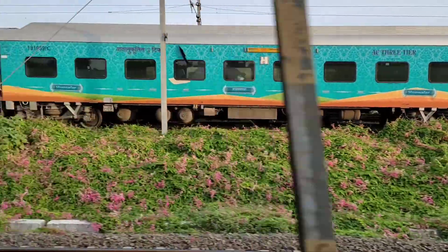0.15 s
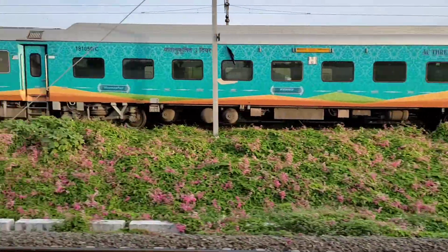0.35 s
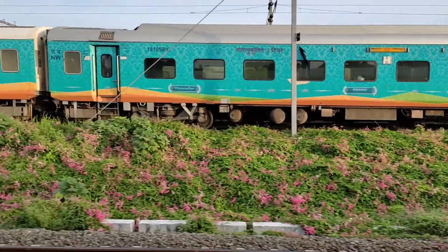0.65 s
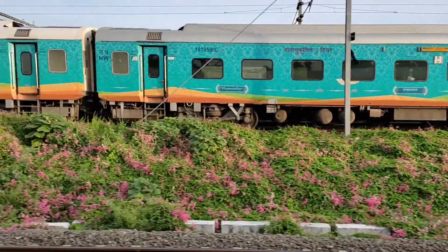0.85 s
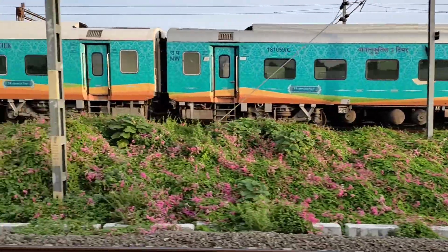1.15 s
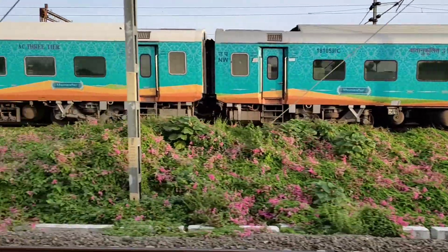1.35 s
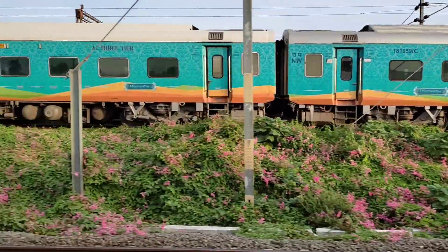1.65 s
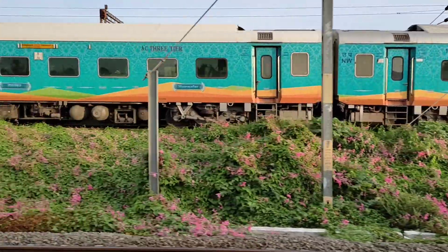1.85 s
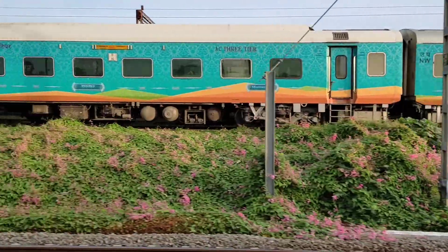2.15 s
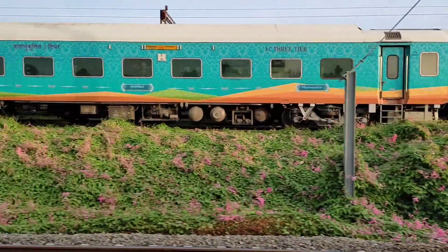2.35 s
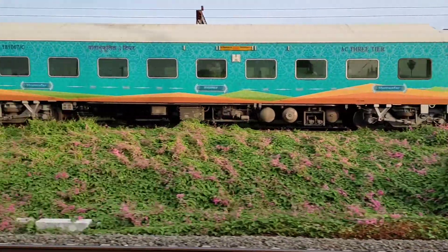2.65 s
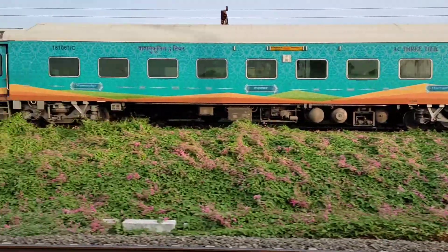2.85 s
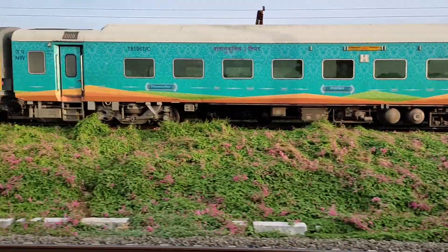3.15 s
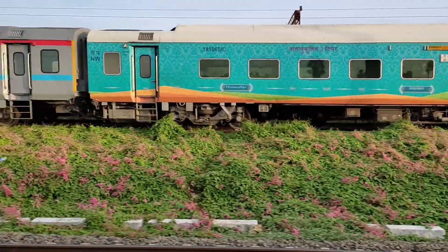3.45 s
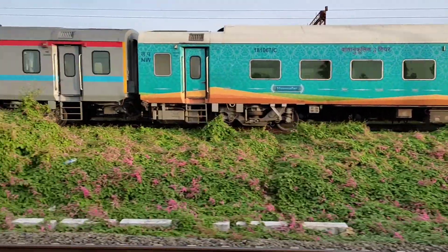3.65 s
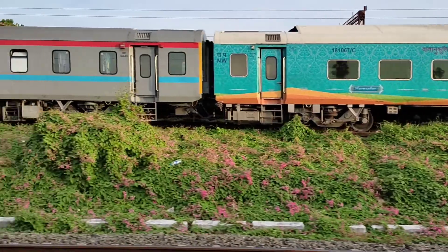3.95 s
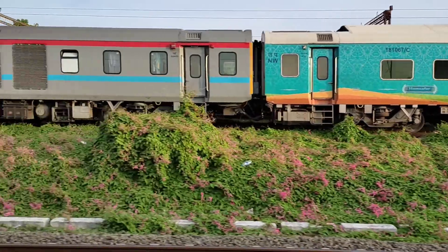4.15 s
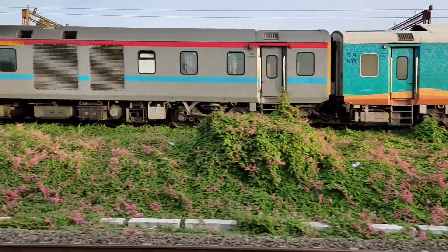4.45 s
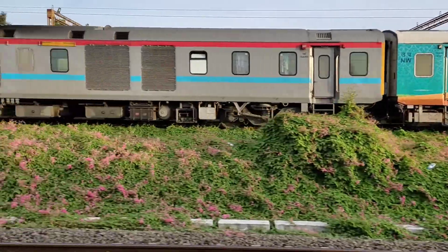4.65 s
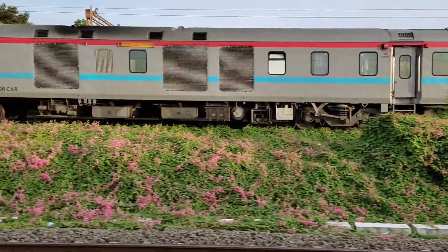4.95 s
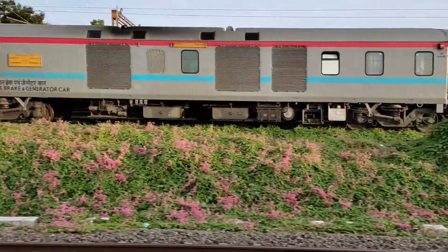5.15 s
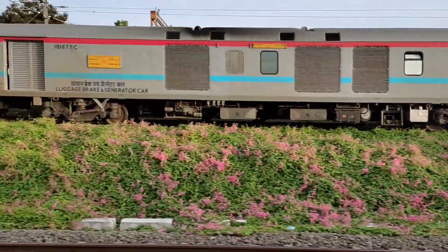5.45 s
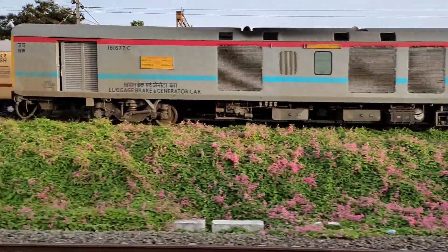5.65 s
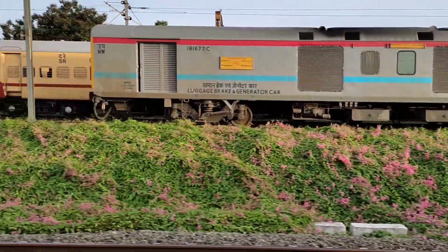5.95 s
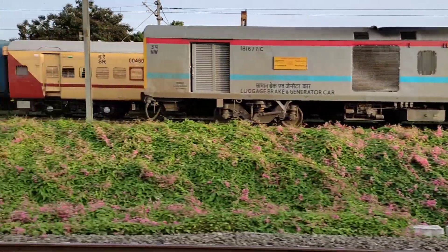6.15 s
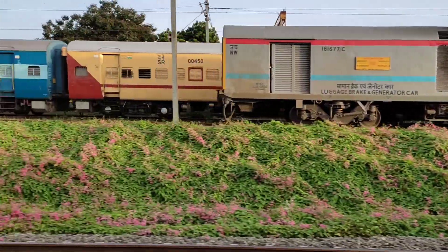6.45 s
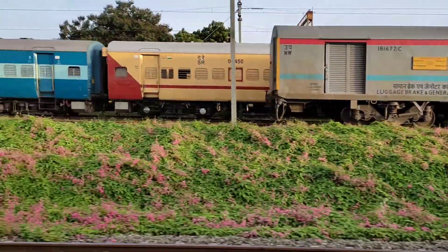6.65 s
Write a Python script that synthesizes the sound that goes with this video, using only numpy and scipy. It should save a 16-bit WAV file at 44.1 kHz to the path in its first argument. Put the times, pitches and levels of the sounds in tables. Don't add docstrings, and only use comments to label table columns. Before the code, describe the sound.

Heavy, low wind noise dominates, fluttering and popping on an exposed recorder aboard a train. Wheels hiss and ring quietly on the rails, joints clack softly, and brush swishes briefly past. Just after three seconds, a sharp clack and a chirp lead into a single buzzing air-horn blast with a blurred tail. More gusts and hard thumps follow, the sound sagging after the strongest, with muffled treble.

```python
import sys
import numpy as np
from scipy import signal
from scipy.fft import rfft, irfft, next_fast_len
from scipy.io import wavfile
from scipy.ndimage import uniform_filter1d, map_coordinates

SR = 44100
rng = np.random.default_rng(int(sys.argv[2]) if len(sys.argv) > 2 else 0)


def amplitude_ratio(level_db):
    exponent = np.asarray(level_db, float) / 20
    return 10 ** exponent


def master_out(mix):
    frames = np.transpose(np.atleast_2d(mix))
    ceiling = np.clip(frames, -1, 1)
    pcm = np.round(ceiling * 32767).astype(np.int16)
    wavfile.write(sys.argv[1], SR, pcm)


N = 300223

# (time [s], depth [dB], hold [s], recovery [s])
DUCKS = [(-.05, 10, .07, 0.81), (0.456, 25, .36, 0.045), (0.892, 18, 0.052, 0.36), (1.008, 4, .28, 0.7),
         (2.126, 10, 0.3, .28), (4.299, 23, 0.2, 0.084), (4.343, 11.5, .3, 0.32), (5.369, 12.5, .11, 0.26),
         (5.501, 3.5, 0.076, 0.28), (5.962, 14.5, .11, 0.16), (6.102, 4.5, 0.12, .26),
         (6.464, 13.5, 0.095, 0.34)]
DUCK_ATTACK_S = 0.05
ROAR_SHARE, CALM_SHARE, ECHO_SHARE = 0.34, 0.33, 0.47

# (frequency [Hz], density [dB per Hz])
ROAR_COLOUR = [(350, -33.5), (600, -5), (1090, -5), (1370, -9), (1510, -7.5), (2000, -10), (2390, -6),
               (2890, -15.5), (3340, -17.5), (3690, -26.5), (5200, -43), (6760, -73), (11400, -120)]
# (frequency [Hz], density [dB per Hz])
HISS_COLOUR = [(2710, -30), (4600, -7.5), (5330, -14), (5930, -3), (6640, -2.5), (7300, -1), (7600, -13.5),
               (9880, -36), (16700, -120)]
# (frequency [Hz], density [dB per Hz])
AIR_COLOUR = [(500, -120), (1000, 3), (3000, -12), (5000, -16.5), (7600, -11)]
ROAR_DB, HISS_DB, AIR_DB = -49, -63.5, -59.5
# (frequency [Hz], width [Hz], level re roar [dB])
WHEEL_RINGS = [
    (1811, 87, -10.5),
    (2130, 95, -14),
    (2383, 46, -11.5),
    (2690, 42, -17),
]
# (time [s], level [dB], length [s])
JOINTS = [(0.54, -54, 0.065), (0.841, -56.5, .055), (1.161, -64.5, .04), (1.772, -54, 0.092),
          (2.057, -53, 0.05), (2.509, -55, .04), (3.196, -44, 0.053), (4.58, -53.5, 0.022),
          (4.834, -62, 0.042), (5, -59.5, 0.031)]
# (frequency [Hz], density [dB per Hz])
CLATTER_COLOUR = [(600, -24), (1200, 4), (2400, -2.5), (3500, -10.5), (4500, -16.5), (5300, -18),
                  (6500, -12), (7500, -14.5)]
# (time [s], attack [s], hold [s], release [s], level [dB])
SWISHES = [
    (0.113, 0.082, 0.23, 0.052, -62.5),
    (2.324, .04, .06, .08, -65),
]
SWISH_HZ, SWISH_WIDTH_HZ = 7050, 800

# (time [s], pitch [Hz], level [dB])
SQUEAK = [
    (3.25, 740, -60),
    (3.268, 738, -28),
    (3.295, 722, -21),
    (3.32, 716, -25),
    (3.34, 712, -32),
    (3.37, 706, -65),
]
# (time [s], level [dB], tilt [dB per octave])
LOW_BLAST = [(3.315, -71, 1.5), (3.34, -38, 5), (3.357, -24.5, 0), (3.45, -23.5, 0), (3.6, -22, -1.3),
             (3.72, -26.5, 2.5), (3.84, -28.5, 0), (3.885, -39, -6), (4.0, -45, -12), (4.3, -78, -5)]
# (time [s], level [dB], tilt [dB per octave])
HIGH_BLAST = [(3.42, -70.5, -4.5), (3.52, -47, 4), (3.65, -28.5, 0.1), (3.8, -33, 0.6), (4.02, -37.5, 2.5),
              (4.06, -41, -0.7), (4.2, -44, -2.7), (4.3, -52.5, 0.5), (4.34, -77.5, -1.5)]
# (multiple of the pitch, level [dB])
LOW_BELL = [
    [(1, -3), (2, -5.5), (3, -4), (4, -7.5), (5, -13), (6, -13), (7, -22.5), (8, -10), (9, -21.5), (10, -21), (11, -36), (12, -39), (13, -41.5), (14, -49.5), (15, -47), (16, -56), (17, -55), (18, -53), (19, -44.5), (20, -34), (21, -38), (22, -35), (23, -33), (24, -35), (25, -31.5)],
    [(1, -5), (2, -6), (3, -6), (4, -8.5), (5, -15.5), (6, -10.5), (7, -11), (8, -20.5), (9, -22.5), (10, -26), (11, -32.5), (12, -26.5), (13, -34.5), (14, -33.5), (15, -34.5), (16, -39.5), (17, -42.5), (18, -41), (19, -45.5), (20, -40.5), (21, -41), (22, -40.5), (23, -51.5), (24, -44), (25, -44)],
]
# (multiple of the pitch, level [dB])
HIGH_BELL = [
    [(1, -17), (2, -14.5), (3, -17.5), (4, -20), (5, -11), (6, -15), (7, -10.5), (8, -23.5), (9, -22), (10, -25), (11, -24.5), (12, -27), (13, -27), (14, -35), (15, -36), (16, -42), (17, -43), (18, -37), (19, -34), (20, -36), (21, -41.5), (22, -50), (23, -42.5), (24, -40)],
    [(1, -2), (2, -10.5), (3, -18), (4, -15.5), (5, -4), (6, -27.5), (7, -27), (8, -11), (9, -37), (10, -18.5), (11, -25), (12, -31), (13, -32), (14, -27), (15, -41), (16, -50.5), (17, -37), (18, -46), (19, -31.5), (20, -25), (21, -31), (22, -36), (23, -39), (24, -36.5)],
]
# (time [s], attack [s], hold [s], release [s], level [dB])
BLAST_AIR = (3.33, .03, .66, .12, -60)
LOW_HZ, HIGH_HZ = 291.8, 307.4
OVERSHOOT, SETTLE_S = 0.011, 0.045
ECHO_TOP_HZ = 4800

# (frequency [Hz], density [dB per Hz])
PUFF_COLOUR = [(200, -10.5), (380, -0.5), (650, -8), (1000, -16.5), (1800, -30), (3000, -39), (6000, -120)]
# (time [s], puff [dB], t60 [s])
MORE_PUFFS = [(.275, -24, .03), (.3, -23, .03), (.345, -25, .02), (.358, -23, .025), (.406, -19, .025),
              (.422, -18, .035), (.443, -20, .02), (.475, -20, .03), (.494, -18, .03), (.51, -24, .02),
              (1.16, -26, .025), (2.099, -24, .03), (2.132, -22, .03), (2.33, -26, .03), (2.484, -21, .025),
              (3.195, -22, .05), (3.345, -19, .025), (3.47, -23, .025), (4.257, -21, .04), (4.502, -15, .03),
              (4.717, -21, .03), (5.2, -24, .03), (5.328, -20, .04), (5.362, -17, .04), (5.4, -29, .03),
              (5.464, -23, .025), (5.745, -25, .025), (5.893, -21, .04), (6.165, -27, .025), (6.234, -16, .04),
              (6.265, -20, .035), (6.31, -21, .035), (6.467, -18, .04), (6.497, -20, .03), (6.512, -22, .025),
              (6.57, -25, .025), (6.594, -24, .025), (6.795, -19, .05)]
MORE_PUFF_HZ, MORE_PUFF_SWING_DB, MORE_PUFF_SNAP = 260, 0, 3
# (time [s], swing [dB], pitch [Hz], puff re swing [dB])
THUMPS = [(0.098, -15.5, 194, -11), (.276, -21.5, 114, -7), (.316, -11, 140, -22),
          (0.387, -16, 126.8, -14.5), (.42, -12, 156.2, -14), (.555, -3.5, 165, -25),
          (1.779, -4.5, 167.3, -20.5), (2.062, -3, 162, -26), (2.097, -8.5, 166.7, -15),
          (2.127, -14, 97, -11), (2.419, -27, 93, -3.5), (2.483, -14, 175, -9.5), (2.866, -11, 110, -22),
          (3.192, -3, 135, -20), (3.266, -11, 181.3, -20), (4.101, -9.5, 241.4, -13.5),
          (4.255, -5.5, 166.7, -14.5), (4.716, -18.5, 206, -7), (5.158, -23.5, 140, -9.5),
          (5.314, -15, 91.8, -17), (5.659, -19, 97.7, -13.5), (5.892, -13, 102.3, -7.5),
          (6.264, -12.5, 91.6, -13), (6.294, -12.5, 87, -11), (6.466, -17, 208, -5),
          (6.594, -20.5, 90.5, -10.5)]
THUMP_T60_S = 0.047
# (time [s], puff [dB], t60 [s])
PUFFS = [(.004, -19.5, 0.046), (0.045, -11.5, 0.016), (.13, -17.5, .03), (.464, -14.5, 0.049),
         (.494, -19.5, 0.033), (0.789, -27.5, 0.023), (.818, -17, 0.1), (0.884, -18.5, 0.016),
         (.848, -20.5, .025), (2.209, -10.5, 0.035), (4.716, -22.5, 0.023), (5.329, -21, .02),
         (1.004, -12, 0.033), (1.017, -31, .019), (1.507, -19, .04), (2.203, -17, 0.033),
         (2.282, -23.5, 0.031), (2.432, -22.5, 0.018), (2.799, -20, 0.034), (4.297, -12, 0.042),
         (4.362, -18.5, 0.038), (4.39, -11, 0.019), (4.503, -15, 0.06), (5.975, -20.5, 0.027),
         (5.174, -13.5, .023), (5.36, -21.5, .024), (5.442, -16, .028), (5.951, -17, 0.023),
         (6.233, -20, .013), (6.621, -16.5, 0.05)]
PUFF_SWING_HZ, PUFF_SWING_DB = 140, -8.5
PUFF_SNAP = 11
# (time [s], puff [dB], t60 [s])
FLURRY = [(.925, -23, 0.032), (.937, -16.5, .03), (.948, -17, 0.035), (.964, -19.5, 0.066),
          (4.51, -17, .026), (.3, -27, .04), (.48, -22.5, .04), (6.5, -21.5, .04), (6.006, -23, .03)]
FLURRY_HZ, FLURRY_SWING_DB = 250, 4.5
# (time [s], peak [dB])
TICKS = [
    (1.0063, -45.5),
    (2.21, -39),
    (4.2983, -56.5),
    (5.176, -49),
    (5.951, -54),
]

# (frequency [Hz], density [dB per Hz])
DEEP_COLOUR = [(15, -40), (30, -20), (45, -14), (62, -2.5), (95, -2), (120, -6), (170, -35.5), (300, -120)]
# (frequency [Hz], density [dB per Hz])
BODY_COLOUR = [(50, -120), (85, -7), (115, -1), (170, 1.5), (250, -5), (320, -8.5), (450, -28), (900, -120)]
# (frequency [Hz], density [dB per Hz])
FLUTTER_COLOUR = [(200, -120), (290, -25), (350, -1), (500, -5), (800, -12.5), (1200, -24.5), (2000, -38.5),
                  (5000, -120)]
# (centre time [s], strength [dB], half length [s], deep buffet re body [dB])
GUSTS = [(0.019, -17, 0.17, 2), (0.52, -20, 0.12, -1), (0.971, -16, .09, -5.5), (1.454, -24.5, 0.17, -4.5),
         (1.817, -22, 0.062, -5.5), (1.919, -29.5, 0.089, 0.5), (2.459, -23.5, 0.37, -2.5),
         (2.624, -24.5, .06, -3), (2.931, -22.5, .09, -3), (3.29, -18, 0.07, -1.5), (3.39, -24, .03, 0),
         (3.494, -24, 0.12, 2), (3.765, -25, .06, -4), (3.99, -21, 0.08, 2), (4.311, -14, 0.089, -1),
         (4.55, -22, .05, 1), (4.995, -26.5, 0.1, -2), (5.198, -20, 0.074, -4.5), (5.361, -18, .09, 4),
         (5.683, -23, 0.15, -2.5), (5.964, -19, 0.08, 2), (6.263, -15, .08, -6.5), (6.488, -15, 0.06, -4),
         (6.623, -22, 0.094, -2.5), (4.66, -31, 0.055, 4), (6.368, -24.5, 0.067, 4.5)]
# (centre time [s], strength [dB], deep buffet re body [dB])
SLAPS = [(.315, -14.5, -10), (.43, -13, -8.5), (0.842, -15.5, -9), (1.07, -31.5, 10), (1.17, -27, 7),
         (1.52, -23, -5), (1.455, -21, -3), (.59, -24, -5), (3.93, -19, -3), (2.6, -23, -3),
         (2.08, -16, -13), (2.222, -18.5, -1), (3.215, -24, -5.5), (4.112, -24, 0), (4.41, -26, 3),
         (4.72, -22, -1), (4.842, -22.5, -4), (4.585, -21, -2), (.95, -19, -12), (4.725, -24, -8),
         (5.458, -15.5, -8.5), (6.8, -16.5, -7)]
SLAP_S, GUST_EDGE = 0.035, 1.4
CALM_DB, CALM_DEEP_DB = -28, -2
FLUTTER_DB, FLUTTER_GROWS = -35, 0.98

TOP_HZ = 7620


def unit(x):
    return x / np.sqrt(np.mean(x ** 2) + 1e-20)


def curves(rows):
    s, *cols = np.transpose(rows)
    return [np.interp(np.arange(N) / SR, s, c) for c in cols]


def wobble(rate, size=N):
    knots = rng.standard_normal(int(size * rate / SR) + 4)
    return map_coordinates(knots, [np.arange(size) * rate / SR])


def filtered(x, response):
    m = next_fast_len(N + SR // 2)
    return irfft(rfft(x, m) * response(np.fft.rfftfreq(m, 1 / SR)), m)[..., :N]


def colour(points):
    f, v = np.transpose(points)
    return lambda hz: amplitude_ratio(np.interp(np.log(hz + 1), np.log(f), v))


def resonance(centre_hz, width_hz):
    return lambda hz: 1 / (1 + (2 * (hz - centre_hz) / width_hz) ** 2)


def rush(response, patchy_db):
    z = signal.stft(rng.standard_normal(N + 512), nperseg=512)[2]
    field = uniform_filter1d(rng.standard_normal(z.shape), size=5, axis=0)
    field = uniform_filter1d(field, size=10, axis=1)
    patchy = signal.istft(z * amplitude_ratio(patchy_db * unit(field)), nperseg=512)[1][:N]
    return unit(filtered(patchy, response))


def ramp(s, attack, hold, release):
    knots = np.cumsum(np.abs([0, attack, hold, release]))
    return np.interp(np.arange(N) / SR - s, knots, [0, 1, 1, 0])


def bursts(rows, rise):
    env, t = np.zeros(N + SR), np.arange(SR // 2) / SR
    for s, db, t60 in rows:
        env[round(s * SR):][:len(t)] += amplitude_ratio(db - 60 * t / t60) * (1 - np.exp(-t / rise))
    return env[:N]


def ducking():
    dips = [db * ramp(s, DUCK_ATTACK_S, hold - DUCK_ATTACK_S, back) for s, db, hold, back in DUCKS]
    return -np.max(dips, axis=0)


def wheel_roar():
    roar = rush(colour(ROAR_COLOUR), patchy_db=1.5)
    for hz, width, db in WHEEL_RINGS:
        roar = roar + amplitude_ratio(db + 1.5 * wobble(6)) * rush(resonance(hz, width), patchy_db=-0.9)
    return roar


def brush_swishes():
    passing = sum(amplitude_ratio(db) * ramp(*shape) for *shape, db in SWISHES)
    return passing * rush(resonance(SWISH_HZ, SWISH_WIDTH_HZ), patchy_db=-1.5)


def joint_clatter():
    t, joints = np.arange(N) / SR, np.zeros(N)
    for s, db, length in JOINTS:
        joints += amplitude_ratio(db) * np.clip((t - s) / 0.008, 0, 1) * np.exp(-(np.abs(t - s) / length) ** 3)
    return amplitude_ratio(9) * joints * amplitude_ratio(1.5 * wobble(90)) * rush(colour(CLATTER_COLOUR), patchy_db=1.4)


def rolling():
    duck_db = ducking()
    roar = wheel_roar()
    hiss = amplitude_ratio(HISS_DB + duck_db) * rush(colour(HISS_COLOUR), patchy_db=1.2)
    swishes = brush_swishes()
    clatter = joint_clatter()
    roar_level = amplitude_ratio(ROAR_DB + ROAR_SHARE * duck_db + 5 + 0.74 * wobble(13))
    steady_air = amplitude_ratio(AIR_DB) * rush(colour(AIR_COLOUR), patchy_db=1.5)
    return roar_level * roar + hiss + swishes + clatter + steady_air


def squeak():
    pitch, level_db = curves(SQUEAK)
    phase = 2 * np.pi * np.cumsum(pitch) / SR
    level = amplitude_ratio(level_db + 2.2 * wobble(50)) * (level_db > -59)
    return level * (np.sin(phase) + amplitude_ratio(-22) * np.sin(2 * phase))


def trumpet(hz, rows, bell, turn_s, flutter_db):
    on = slice(round(rows[0][0] * SR), round(rows[-1][0] * SR))
    level_db, tilt_db = [c[on] for c in curves(rows)]
    size = len(level_db)
    pitch = hz * (1 + OVERSHOOT * np.exp(-np.arange(size) / SR / SETTLE_S))
    phase = 2 * np.pi * np.cumsum(pitch + 0.7 * wobble(25, size=size)) / SR
    late = np.clip((np.arange(N)[on] / SR - turn_s) / 0.51 + 0.5, 0, 1)
    tone = np.zeros(N)
    for (k, early_db), (_, late_db) in zip(*bell):
        db = level_db + early_db + (late_db - early_db) * late + tilt_db * np.log2(k / 3)
        db = db + flutter_db * (0.7 * wobble(14, size=size) + 1.1 * wobble(55, size=size))
        tone[on] += amplitude_ratio(db) * np.sin(k * phase + k * k)
    return tone


def cutting_echo(x):
    t = np.arange(SR) / SR
    tail = rng.standard_normal(SR) * amplitude_ratio(-60 * t / 2.5) * (t > 0.03)
    scatter = amplitude_ratio(-10.5) * wobble(40) + amplitude_ratio(-10.5) * wobble(130) + amplitude_ratio(-14) * wobble(350)
    echo = signal.fftconvolve(scatter * x, tail / np.linalg.norm(tail))[:N]
    echo = filtered(echo, lambda hz: 1 / (1 + (hz / ECHO_TOP_HZ) ** 4))
    return echo * amplitude_ratio(ECHO_SHARE * ducking())


def horn():
    chirp = squeak()
    low = trumpet(LOW_HZ, LOW_BLAST, LOW_BELL, turn_s=3.51, flutter_db=2.5)
    high = trumpet(HIGH_HZ, HIGH_BLAST, HIGH_BELL, turn_s=3.95, flutter_db=3.5)
    chord = low + high
    echo = cutting_echo(chord + 0.6 * chirp)
    *shape, air_db = BLAST_AIR
    air = amplitude_ratio(air_db) * ramp(*shape) * rush(colour(HISS_COLOUR), patchy_db=-0.8)
    return chirp + chord + air + echo


def eddies(rows, snap, rise):
    out, t = np.zeros(N + SR), np.arange(SR // 10) / SR - 0.05
    after = np.clip(t, 0, None)
    dull = colour(PUFF_COLOUR)(np.fft.rfftfreq(len(t), 1 / SR))
    for s, swing_db, hz, db, t60 in rows:
        air = rng.standard_normal(len(t))
        swing = np.exp(-((t - 1.22 / hz) * hz / 0.99) ** 2) * np.sin(2 * np.pi * (hz * t + air[0]))
        jolt = snap * np.sign(air[1]) * np.exp(-((t - 0.0013) / 0.00012) ** 2) / 8
        spray = air * amplitude_ratio(-60 * after / t60) * (1 - np.exp(-after / rise))
        puff = irfft(rfft(jolt + spray) * dull, len(t))
        out[round(s * SR):][:len(t)] += amplitude_ratio(swing_db) * swing + amplitude_ratio(db + 3) * puff / np.abs(puff).max()
    return out[SR // 20:][:N]


def more_puffs():
    rows = [(s, db + MORE_PUFF_SWING_DB, MORE_PUFF_HZ, db - 2.5, t60) for s, db, t60 in MORE_PUFFS]
    return eddies(rows, snap=MORE_PUFF_SNAP, rise=0.0025)


def pops():
    big = [(s, db, hz, db + puff_db, THUMP_T60_S) for s, db, hz, puff_db in THUMPS]
    pitch = PUFF_SWING_HZ * np.exp(0.3 * rng.standard_normal(len(PUFFS)))
    small = [(s, db + PUFF_SWING_DB, hz, db, t60) for (s, db, t60), hz in zip(PUFFS, pitch)]
    dense = [(s, db + FLURRY_SWING_DB, FLURRY_HZ, db, t60) for s, db, t60 in FLURRY]
    thumps = eddies(big, snap=0.4, rise=0.0067)
    puffs = eddies(small, snap=PUFF_SNAP, rise=0.003)
    flurry = eddies(dense, snap=2, rise=0.0027)
    ticks = bursts([(s, db + 14.5, 0.003) for s, db in TICKS], rise=0.0001) * rng.standard_normal(N)
    return thumps + puffs + flurry + ticks


def gust_power():
    t = np.arange(0, N, 64) / SR
    calm = amplitude_ratio(CALM_DB + CALM_SHARE * ducking()[::64])
    deep_power, body_power = (amplitude_ratio(CALM_DEEP_DB) * calm) ** 2, calm ** 2
    slaps = [(s, db, SLAP_S, deep_db) for s, db, deep_db in SLAPS]
    for s, db, half, deep_db in GUSTS + slaps:
        bump = (amplitude_ratio(db) * np.exp(-(np.abs(t - s) / half) ** GUST_EDGE)) ** 2
        deep_power = deep_power + amplitude_ratio(2 * deep_db) * bump
        body_power = body_power + bump
    return curves(np.transpose([t, deep_power, body_power]))


def wind():
    deep_power, body_power = gust_power()
    strength = np.sqrt(body_power)
    eddy = wobble(28)
    deep = unit(amplitude_ratio(0.96 * eddy) * rush(colour(DEEP_COLOUR), patchy_db=1.5))
    body = unit(amplitude_ratio(3.2 * eddy + 1.73 * wobble(45)) * rush(colour(BODY_COLOUR), patchy_db=0.2))
    flutter = unit(amplitude_ratio(1.8 * eddy + 2.6 * wobble(90)) * rush(colour(FLUTTER_COLOUR), patchy_db=-0.8))
    flutter_level = amplitude_ratio(FLUTTER_DB) * (10 * strength) ** FLUTTER_GROWS
    return np.sqrt(deep_power) * deep + strength * body + flutter_level * flutter


def scene():
    return (wind() + pops() + rolling() + horn() + more_puffs())[None]


def roll_off(x):
    return signal.sosfilt(signal.butter(12, 8410, fs=SR, output="sos"), x)


def record(dry):
    squeezed = dry / (1 + np.abs(dry / 0.8) ** 5) ** (1 / 5)
    mix = filtered(squeezed, lambda hz: np.where(hz < TOP_HZ, 1, amplitude_ratio(-38)) * (hz > 18))
    return roll_off(mix)


dry = scene()
out = record(dry)
master_out(out)
```